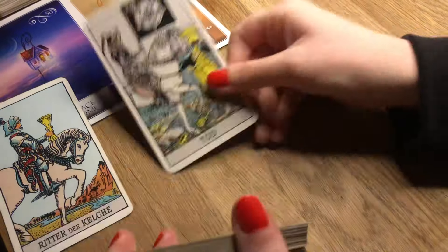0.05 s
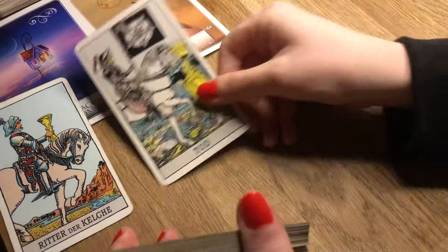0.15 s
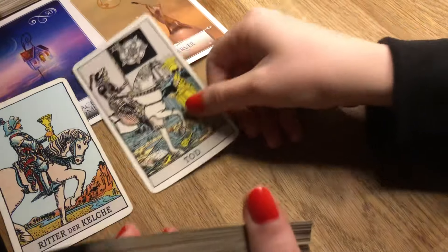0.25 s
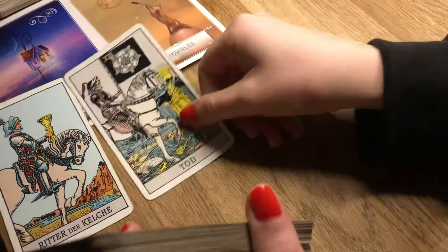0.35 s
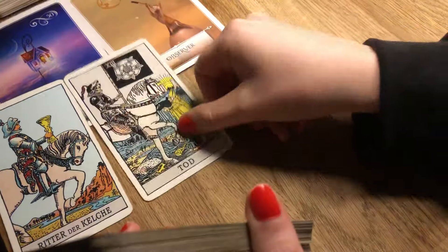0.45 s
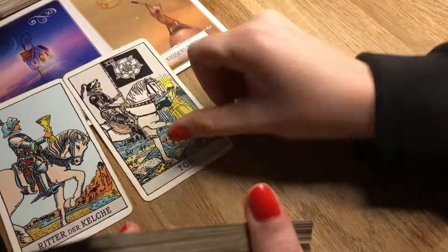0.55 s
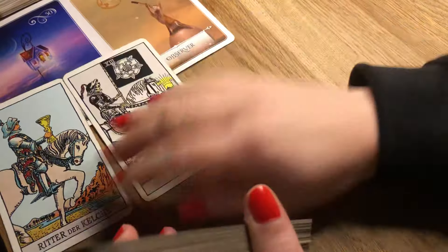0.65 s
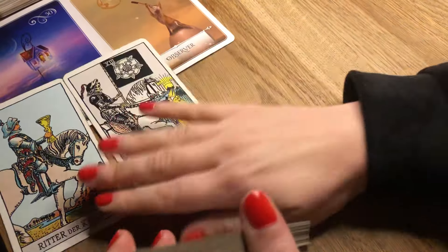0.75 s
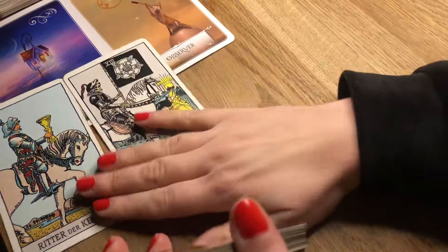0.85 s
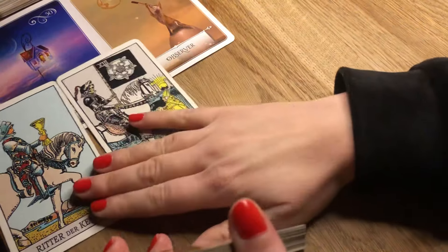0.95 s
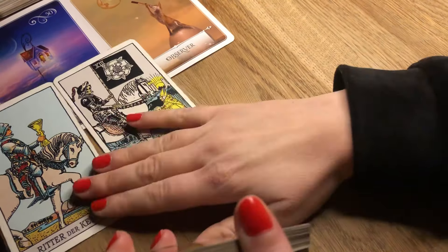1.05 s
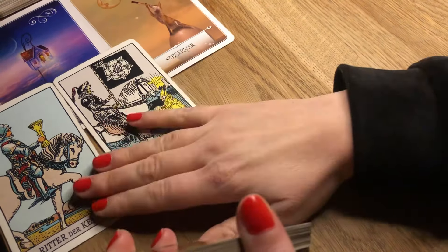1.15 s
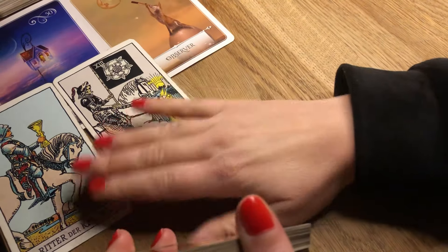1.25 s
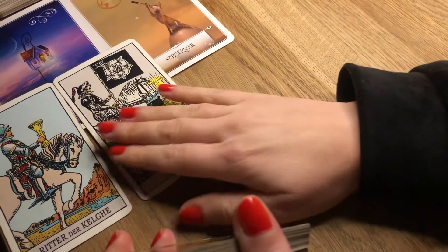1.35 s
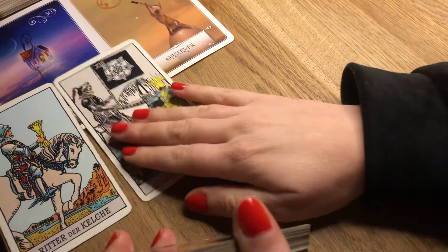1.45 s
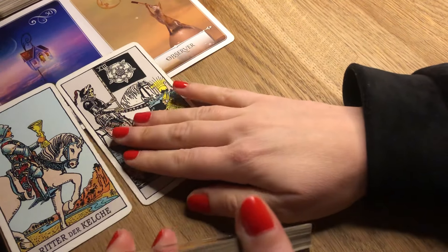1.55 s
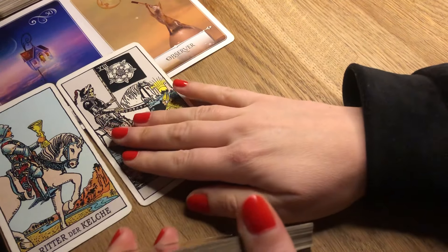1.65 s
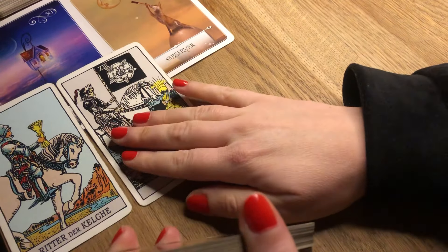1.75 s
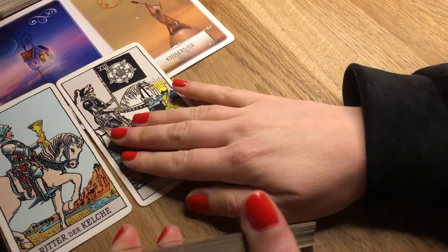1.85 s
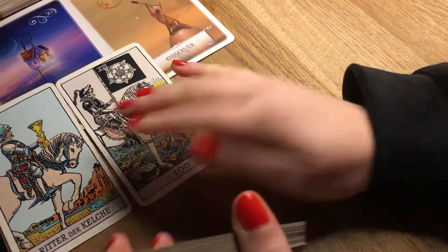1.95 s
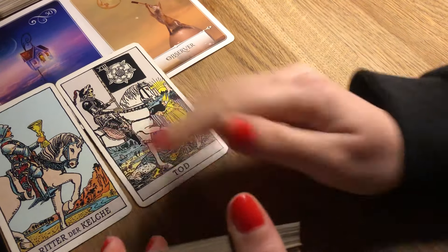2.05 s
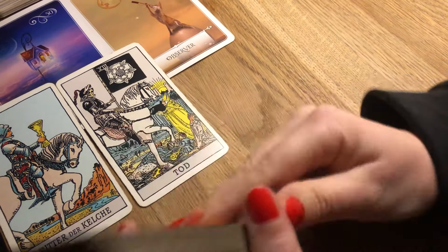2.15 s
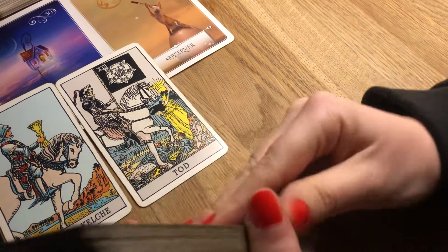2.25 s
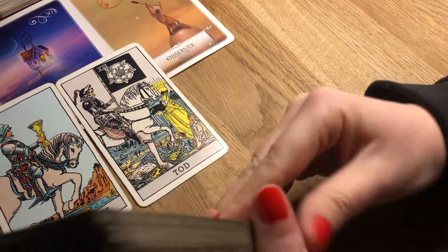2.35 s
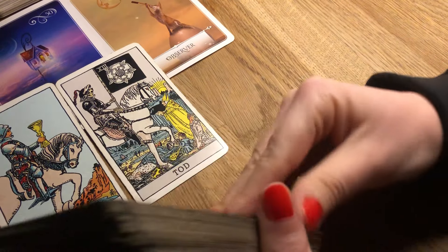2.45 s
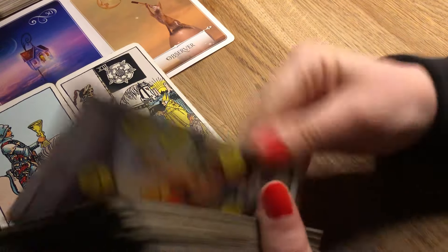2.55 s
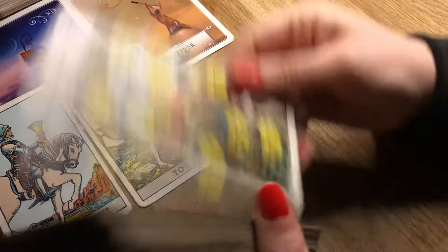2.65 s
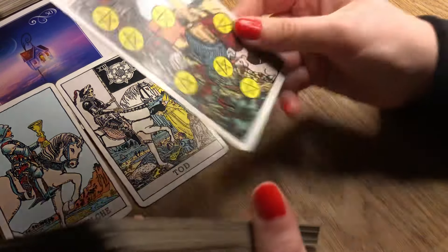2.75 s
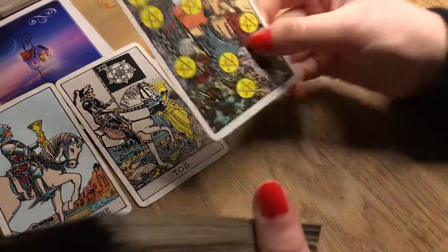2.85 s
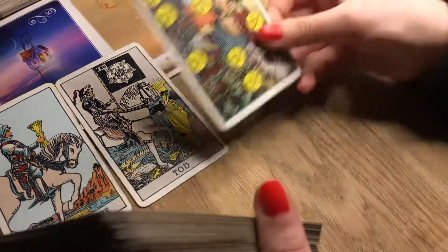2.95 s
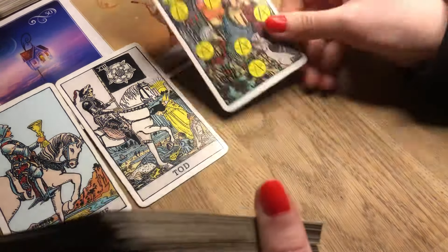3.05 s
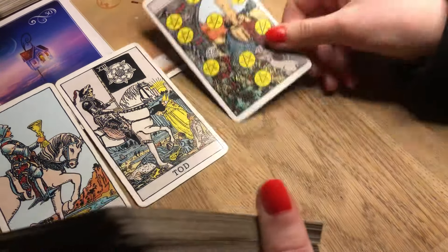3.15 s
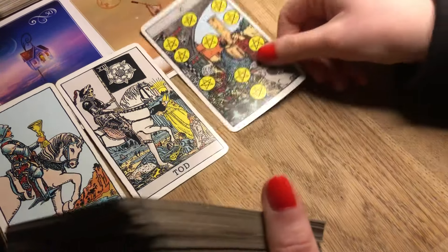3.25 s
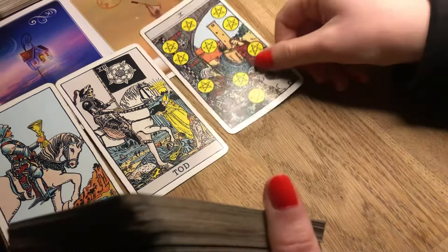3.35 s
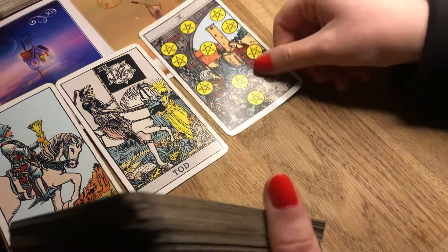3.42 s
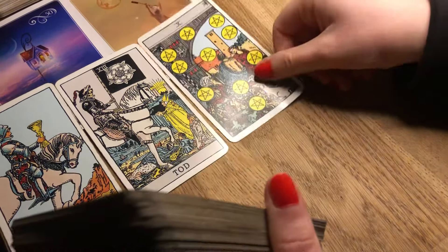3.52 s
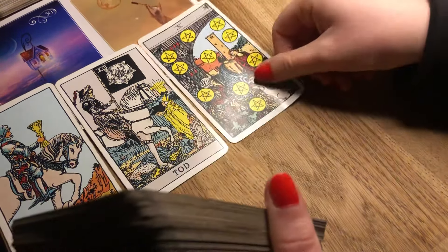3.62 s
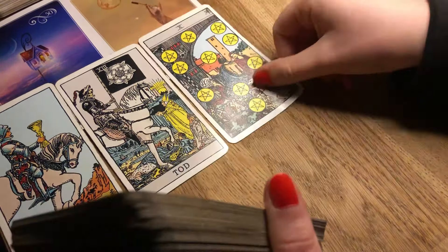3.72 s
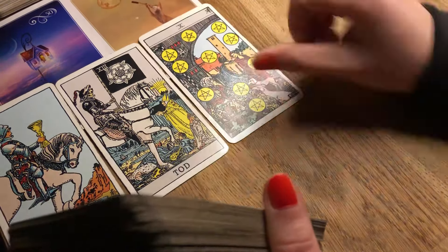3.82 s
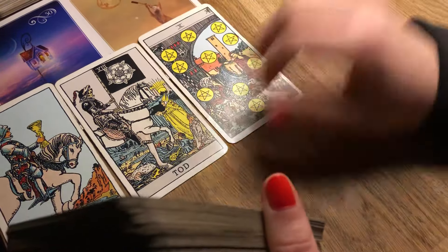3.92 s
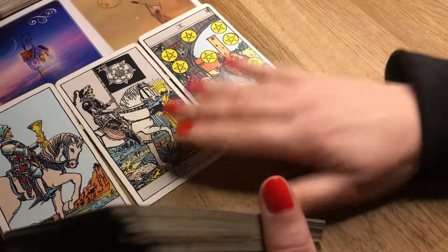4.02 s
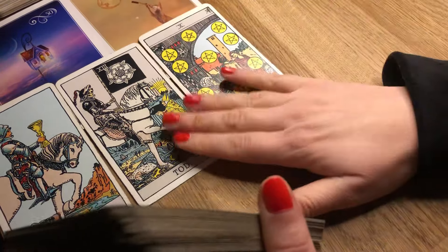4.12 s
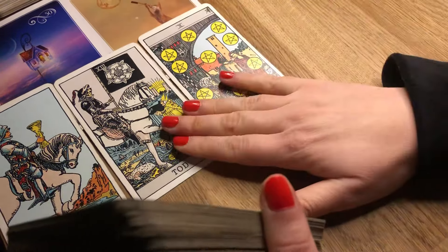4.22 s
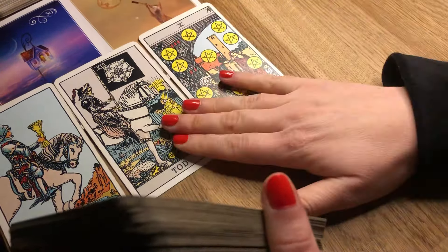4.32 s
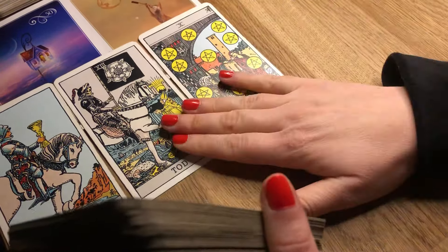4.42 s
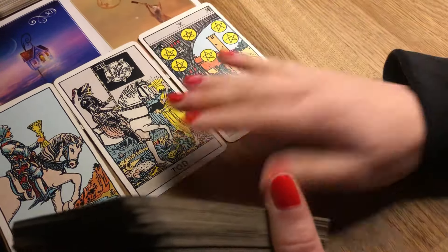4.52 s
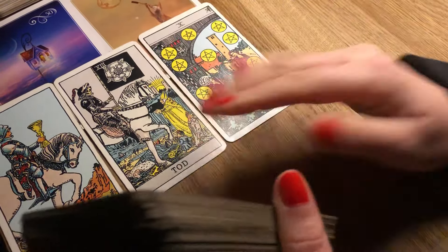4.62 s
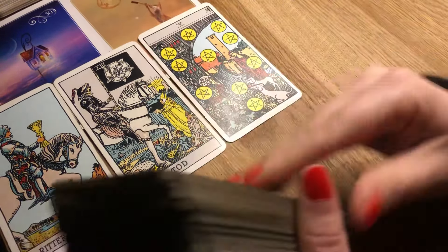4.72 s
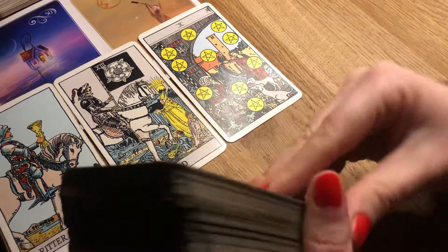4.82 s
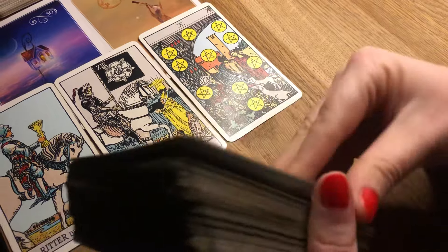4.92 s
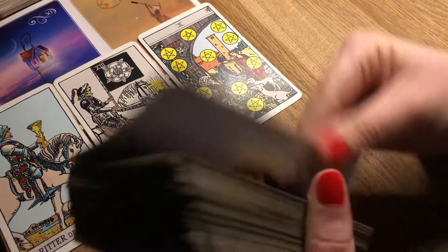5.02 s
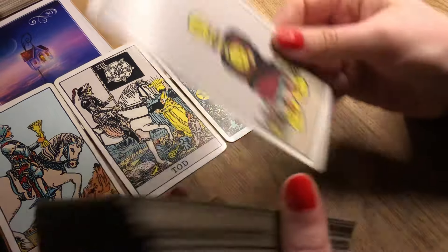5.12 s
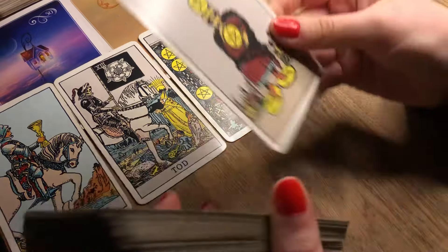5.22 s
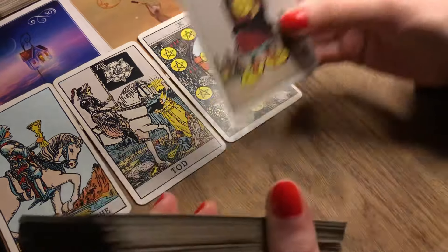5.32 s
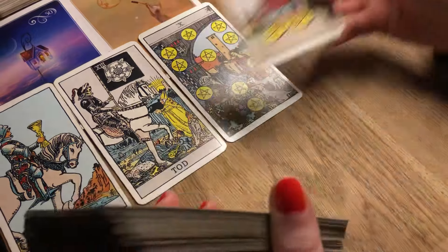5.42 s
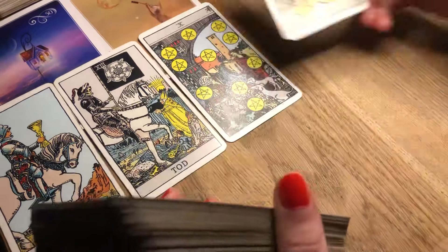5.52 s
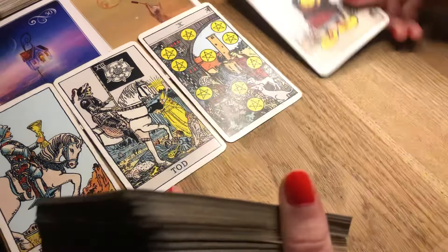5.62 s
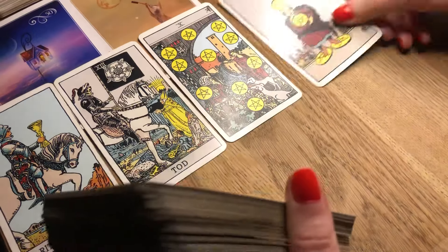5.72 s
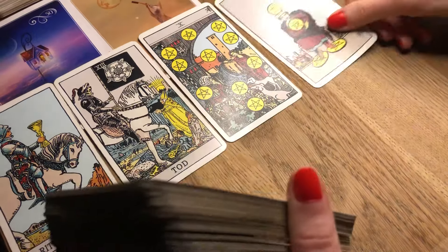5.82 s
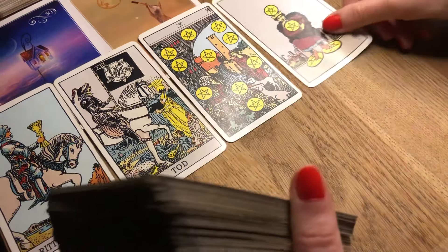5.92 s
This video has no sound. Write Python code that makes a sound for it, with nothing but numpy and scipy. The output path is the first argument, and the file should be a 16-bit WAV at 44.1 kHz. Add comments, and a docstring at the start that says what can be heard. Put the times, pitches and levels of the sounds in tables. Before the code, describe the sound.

Cards being dealt one by one onto wood, with sharp corner snaps, springy pops off the deck and soft hand pats.

```python
"""Dealing cards onto a wooden table

In a small quiet room, a stiff card hisses off the deck and flops as it springs straight.
Cards click down on their edges, slide into place and snap from under the thumb as a bent
corner slaps the wood. The hand pats and smooths them, and the table knocks and rings in
answer. Low rumble, hiss and a thin electric whine hang in the air."""
import sys
import numpy as np
from scipy import signal
from scipy.fft import rfft, irfft
from scipy.io import wavfile
from scipy.ndimage import uniform_filter1d

SR = 44100
rng = np.random.default_rng(int(sys.argv[2]) if len(sys.argv) > 2 else 0)


def store_pcm(level_fs):
    """Save levels as 16-bit WAV."""
    pcm = np.round(np.clip(level_fs, -1, 1) * 32767).astype(np.int16)
    wavfile.write(sys.argv[1], SR, np.atleast_2d(pcm).T)


N = 263277
TIME = np.arange(N) / SR
TAPS = 4096  # samples in one short sound
HZ = np.fft.rfftfreq(TAPS, 1 / SR)

# A bent corner snaps down. Each row: time in seconds, level in dB, brightest pitch in Hz and level in
# dB sent round the room, seconds since it left the finger, slip against slap in dB, knock level in dB,
# knock hardness in Hz, creep level in dB, creep rise in seconds.
SNAPS = [(0.4591, 7.8, 5820, 8.2, .0011, -2, -0.5, 521, -46, 0.017),
         (3.7354, 6.6, 8260, 5.5, 0.0013, -0.5, 2, 1060, -34, .003)]
# A card flexes with a pop, faintly as the hand grips the deck, loudly as it springs free.
# Each row: time in seconds, level in dB, pitch in Hz, air puff in dB,
# rattle against pop in dB, how narrow the pop's band is, papery crackle in dB.
FLOPS = [(2.314, -22, 1026, -21, -13, 21, -52), (2.6685, 10, 904, 7.5, 0, 3.86, -30.5),
         (5.1227, 11, 1010, 8.5, -1, 3.2, -10.5)]
# A card is pulled off the deck. Each row: start, firmest grip and release in seconds, level in dB,
# treble lift of the last edge in dB, swell in dB per second, last flick in dB.
DRAWS = [(2.478, 2.618, 2.657, -44.5, 11.5, 266.5, -26), (4.966, 5.053, 5.112, -45.5, 5.5, 199, -13.5)]
# A card is set on its edge. Each row: time in seconds, relative level in dB, fade in seconds.
SET_DOWNS = [(0.0921, -14.5, 0.014), (3.1188, -23.5, 0.0093), (5.6377, -16.5, 0.015)]
# Nearby surfaces throw a flop back. Each row: delay in seconds, gain.
BOUNCES = [(.00295, 0.66), (.0052, 0.77), (.0083, .3), (0.0173, 0.026)]


def amp(db):
    """Turns decibels into a gain."""
    return 10 ** (np.asarray(db) / 20)


def evened(x):
    """Scales a sound to an average (rms) level of 1."""
    return x / np.sqrt(np.mean(x ** 2) + 1e-20)


def read(points, hz):
    """Reads between the rows of a table, along a scale of octaves."""
    row_hz, value = np.transpose(points)
    return np.interp(np.log(hz + 1), np.log(row_hz + 1), value)


def add(mix, s, sound):
    """Mixes a sound in at s seconds."""
    part = mix[max(round(s * SR), 0):][:len(sound)]
    part += sound[:len(part)]


def tinted(x, colour):
    """Shapes a long sound by rows of Hz and dB, then evens it to level 1."""
    gain = amp(read(colour, np.fft.rfftfreq(N, 1 / SR)))
    return evened(irfft(rfft(x) * gain, N))


def click(gain):
    """The sharpest click that has the given gain at each frequency."""
    log_gain = np.log(np.maximum(gain, 1e-5))
    mirrored = np.concatenate([log_gain, log_gain[-2:0:-1]])
    return np.fft.ifft(np.exp(np.conj(signal.hilbert(mirrored)))).real


def hump(centre_hz, rise, fall):
    """A broad hill of gain over frequency, about 1 high."""
    ratio = HZ / centre_hz
    return 2 * ratio ** rise / (1 + ratio ** (rise + fall))


def peak(hz):
    """A rounded peak of gain, 1 high at the given pitch."""
    return HZ / hz * np.exp(1 - HZ / hz)


def chatter(fade_s):
    """A cluster of tiny contacts that dies by 60 dB in fade_s."""
    burst = rng.standard_normal(TAPS) * amp(-60 * TIME[:TAPS] / fade_s)
    return burst / np.linalg.norm(burst)


def friction(grains_per_s, grain_share, depth_db, patch_s=0.03, patch_hz=600):
    """Fibres catch and let go; brief resonances come and go as the contact point moves."""
    slips = rng.standard_normal(N) * (rng.random(N) < grains_per_s / SR)
    hiss = np.sqrt(1 - grain_share) * rng.standard_normal(N) + np.sqrt(grain_share) * evened(slips)
    hz, t, bands = signal.stft(hiss, SR, nperseg=256)
    patches = rng.standard_normal(bands.shape[::-1]).T
    patches = uniform_filter1d(patches, size=round(patch_s / t[1]), axis=1)
    patches = uniform_filter1d(patches, size=round(patch_hz / hz[1]), axis=0)
    bands = bands * amp(depth_db * evened(patches))
    return evened(signal.istft(bands, SR, nperseg=256)[1][:N])


def background(air_db=-70.13):
    """Low room rumble, hiss and a steady electric whine."""
    # The air's tone and the whine's two notes. Each row: frequency in Hz, level in dB.
    air_colour = [(15, -50), (25, -28), (40, -11.5), (62, -4), (130, -4), (300, -5.5), (500, -10),
                  (1000, -16.5), (2000, -22), (4000, -23), (8000, -27), (15500, -31), (16200, -49)]
    whine_notes = [(7654, -79.5), (15308, -92.5)]
    whine = sum(amp(db) * np.sqrt(2) * np.sin(2 * np.pi * hz * TIME) for hz, db in whine_notes)
    return amp(air_db) * tinted(rng.standard_normal(N), air_colour) + whine


def room(x, gap_s=0.0046, build_s=0.0072, echoes_per_s=5000):
    """Dense echoes begin after a short gap; each band dies at its own speed."""
    # How long the room rings. Each row: frequency in Hz, seconds to fade by 60 dB.
    fades = [(100, 0.53), (300, 0.32), (1000, 0.4), (2500, 0.35), (5500, 0.41), (9000, .28), (15000, 0.25)]
    # The tone of the echoes. Each row: frequency in Hz, gain in dB.
    colour = [(100, 2), (1000, 2), (2200, -1), (5000, -7.5), (9000, -6.5), (15000, -7)]
    t = TIME[:SR * 3 // 4]
    echoes = rng.choice([-1., 1.], len(t)) * (rng.random(len(t)) < echoes_per_s / SR)
    hz, frame_s, bands = signal.stft(echoes, SR, nperseg=256)
    bands *= amp(-60 * frame_s / read(fades, hz)[:, None])
    tail = signal.istft(bands, SR, nperseg=256)[1][:len(t)]
    tail *= np.clip((t - gap_s) / build_s, 0, 1)
    tail = signal.fftconvolve(tail / np.linalg.norm(tail), click(amp(read(colour, HZ))))
    return signal.fftconvolve(x, tail)[:N]


def rubs(uneven_db=1.5, catches_per_s=25, catch_db=-13):
    """Cards and skin rub under uneven pressure: strokes, shifting fingers, the creep before a snap."""
    # The hand slides, turns, smooths or feels for a card.
    # Each row: start in seconds, length in seconds, level in dB, fizz against body in dB.
    strokes = [(0, 0.35, -65.5, -11.5), (0.818, 0.15, -72.5, -9.5), (1.296, 0.2, -70, -8.5),
               (1.945, 0.21, -69.5, -5), (2.915, 0.025, -66, -5), (2.897, 0.14, -69, -1),
               (3.233, 0.062, -67, -17), (3.44, 0.077, -69, -11), (3.659, 0.068, -69.5, -6),
               (3.906, .14, -71, -8), (4.557, .15, -72, -5), (4.839, 0.067, -66, -1.5),
               (5.362, 0.2, -68, -1), (5.687, 0.11, -66.5, -12)]
    # The tones of a rub's body, its high fizz and the creep. Each row: frequency in Hz, level in dB.
    body_colour = [(60, -30.5), (250, -3), (600, -0.5), (1500, -0.5), (3800, 1), (6500, -7), (9000, -19.5),
                   (16000, -40)]
    fizz_colour = [(3000, -25), (6500, -1), (9000, 1.5), (12000, 0), (16000, -5.5)]
    creep_colour = [(200, -12), (1200, -5.5), (2400, -7), (4000, -1), (6000, -5.5), (9000, -10),
                    (16000, -24)]
    catches = evened(rng.choice([-1., 1.], N) * (rng.random(N) < catches_per_s / SR))
    grain = friction(grains_per_s=2100, grain_share=0.083, depth_db=2.24) + amp(catch_db) * catches
    body, fizz = tinted(grain, body_colour), tinted(grain, fizz_colour)
    pressure = amp(uneven_db * tinted(rng.standard_normal(N), [(10, 0), (50, -4), (200, -60)]))
    # one more stroke after each draw, as the fingers shift on the card
    shifts = [(free + 0.085, 0.11, -67, -1.5) for _, _, free, *_ in DRAWS]
    out = np.zeros(N)
    for start, length, db, fizz_db in strokes + shifts:
        speed = np.exp(-((TIME - start - length / 2) / (0.44 * length)) ** 2 / 2)
        out += amp(db) * speed * (body + amp(fizz_db) * fizz)
    # the bent corner creeps ever faster over the fingertip until it lets go
    creep = sum(amp(db) * np.exp(-abs(s - TIME) / rise) * (TIME < s) for s, *_, db, rise in SNAPS)
    return pressure * (out + creep * tinted(grain, creep_colour))


def knocks(spread=0.085, ring_db=-53, edge_db=-6.5, edge_hz=1300, jolt_db=-11, jolt_hz=192):
    """Each blow sends bending waves across the table, the bass arriving last, and the wood rings on."""
    # The table's own notes. Each row: pitch in Hz, relative level in dB, seconds to fade by 60 dB.
    notes = [(65, -5, 0.67), (121, -2.5, 0.2), (222, 1.5, 0.61), (322.5, 1, 0.15), (394, -8.5, 0.41),
             (728, -14, .3), (883, -12.5, .28), (1020, -8.5, .25)]
    # The first push through the wood. Each row: frequency in Hz, level in dB.
    push_colour = [(20, -35), (60, -11), (150, -1), (310, 7.5), (470, -1), (750, 4), (1050, 3.5),
                   (1400, -5.5), (2500, -17.5), (16000, -47)]
    # Finger pads land. Each row: time in seconds, level in dB, hardness in Hz (higher is brighter).
    pats = [(.876, -12, 100), (1.322, -9.5, 100), (2.464, -22, 676), (4.229, -15.5, 380),
            (5.64, -12.5, 150.6), (5.855, -14, 182)]
    t = TIME[:SR // 2]
    wood = sum(amp(ring_db + db - 60 * t / fade) * np.sin(2 * np.pi * hz * t) for hz, db, fade in notes)
    bass_lag = np.exp(-4j * np.pi * spread * np.sqrt(HZ))
    add(wood, 0, irfft(amp(read(push_colour, HZ)) * bass_lag))
    corners = [(s - lead, db, hz) for s, _, _, _, lead, _, db, hz, _, _ in SNAPS]
    edges = [(s, db + edge_db, edge_hz) for s, db, _ in SET_DOWNS]
    jolts = [(s, jolt_db, jolt_hz) for s, *_ in FLOPS]  # passed on by the hand that holds the deck
    out = np.zeros(N)
    for s, db, hz in pats + corners + edges + jolts:
        blow = click(1 / np.sqrt(1 + (HZ / hz) ** 4))
        add(out, s, amp(db) * signal.fftconvolve(wood, blow))
    return out


def ticks(trim_db=-2, edge_hz=3200, flick_lead_s=0.0066, flick_hz=7000, flick_fade_s=0.008):
    """Nails and card edges touch with a short dry chatter."""
    # Nails catch on a card.
    # Each row: time in seconds, relative level in dB, brightness in Hz, fade in seconds.
    nails = [(0.027, -27.5, 9500, .09), (.22, -23.5, 2396, 0.068), (.861, -32, 4500, 0.056),
             (2.147, -30.5, 7940, 0.0098), (2.2803, -29, 6160, .08), (2.4631, -22, 4210, 0.12),
             (3.6513, -31.5, 3460, .02), (3.6834, -30, 6140, .018), (4.478, -36.5, 6370, .03),
             (4.742, -29, 6000, 0.14), (4.956, -29, 3500, .02), (4.9719, -23, 4500, 0.0053),
             (5.4484, -26.5, 3460, 0.022), (5.858, -33, 4500, 0.076)]
    edges = [(s, db, edge_hz, fade_s) for s, db, fade_s in SET_DOWNS]
    flicks = [(free - flick_lead_s, db, flick_hz, flick_fade_s) for _, _, free, *_, db in DRAWS]
    out = np.zeros(N)
    for s, db, hz, fade_s in nails + edges + flicks:
        touch = click(hump(hz, rise=0.49, fall=1.82))
        add(out, s, amp(db + trim_db) * signal.fftconvolve(touch, chatter(fade_s)))
    return out


def draws(treble_hz=7000, treble_db=1, full_speed_s=0.065, grip_db=-11, grip_s=0.014,
          edge_s=0.016, runout_db=-3):
    """Card slides on card: louder as it speeds up, dull under the grip, bright at the last edge."""
    # The tone of the slide. Each row: frequency in Hz, level in dB.
    colour = [(100, -21), (500, -13.5), (900, -13.5), (1400, -8), (2000, -11), (2900, -3.5), (4400, -6.5),
              (7000, -10.5), (10000, -13.5), (14500, -20.5), (16000, -26.5)]
    hiss = tinted(friction(grains_per_s=3500, grain_share=0.29, depth_db=3.55), colour)
    treble = signal.sosfiltfilt(signal.butter(2, treble_hz, "high", fs=SR, output="sos"), hiss)
    out = np.zeros(N)
    for start, firmest, free, db, edge_db, db_per_s, _ in DRAWS:
        left_s = np.maximum(free - TIME, 0)
        touching = uniform_filter1d(((TIME >= start) & (TIME <= free)) * 1., size=128)
        grip = np.exp(-((TIME - firmest) / grip_s) ** 2 / 2)
        edge = np.exp(-(left_s / edge_s) ** 2 / 2)
        gain = amp(db - db_per_s * np.maximum(left_s - full_speed_s, 0) + runout_db * edge)
        lift = amp(treble_db + grip_db * grip + edge_db * edge)
        out += touching * gain * (hiss + (lift - 1) * treble)
    return out


def sideways_pops(db=-12, hz=1750, sharpness=12):
    """Each drawn card throws a higher pop sideways, heard only by way of the room."""
    out = np.zeros(N)
    for _, _, free, *_ in DRAWS:
        add(out, free + BOUNCES[2][0], amp(db) * click(peak(hz) ** sharpness))
    return out


def flops(puff_hz=225, puff_delay_s=0.00531, pull_gap_s=0.00837, broad_db=-29, rattle_s=0.0042,
          ring_hz=965, ring_db=-61, ring_fade_s=0.238, crackle_hz=3000, crackle_width_hz=900):
    """A card flexes: a pop with close echoes, a rattle, a puff of air and a brief ring."""
    out, middle_s = np.zeros(N), TAPS / 2 / SR
    echoes = 1 + sum(gain * np.exp(-2j * np.pi * HZ * delay) for delay, gain in BOUNCES)
    ring = amp(ring_db - 60 * TIME[:SR] / ring_fade_s) * np.cos(2 * np.pi * ring_hz * TIME[:SR])
    # the flexing card pulls in air twice
    pulls = 1 + 0.37 * np.exp(2j * np.pi * HZ * pull_gap_s)
    puff = peak(puff_hz) * pulls * np.exp(-2j * np.pi * HZ * puff_delay_s)
    # the rattle swells and dies around the first echo
    swell = np.exp(-abs(TIME[:TAPS] - middle_s - BOUNCES[0][0]) / rattle_s)
    for s, db, hz, puff_db, rattle_db, sharpness, crackle_db in FLOPS:
        pop = peak(hz) ** (2 * sharpness) + amp(broad_db) * np.e * peak(hz)
        shake = rng.standard_normal(TAPS) * swell
        rattle = rfft(np.fft.fftshift(shake / np.linalg.norm(shake)))
        crackle = amp(crackle_db) * rattle * np.exp(-((HZ - crackle_hz) / crackle_width_hz) ** 2)
        spectrum = amp(db) * pop * (echoes + amp(rattle_db) * rattle) + crackle - amp(puff_db) * puff
        add(out, s - middle_s, np.fft.fftshift(irfft(spectrum)))
        add(out, s, amp(db) * ring)
    return out


def snaps(slip_fade_s=0.0033, flutter_fade_s=0.018, flutter_db=-8, lowest_hz=1300,
          slip_around_db=-7, slip_hz=5300, slip_width_hz=2800):
    """A corner scrapes off the finger, slaps the wood and flutters; gives direct and all-round sound."""
    # The card's resonances, one list a snap. Each row: pitch in Hz, width in Hz, level in dB.
    cards = [
        [(1877, 900, -14.5), (3907, 710, -1), (4700, 520, -0.5), (5750, 400, 1), (7120, 190, -6.5),
         (8523, 1200, 1.5), (14150, 1900, -6.5)],
        [(1730, 220, -5), (2850, 350, -4.5), (3480, 280, -3.5), (5100, 500, -11), (6000, 490, -5.5),
         (8600, 710, 3.5), (11500, 1900, -2.5)],
    ]
    direct, around = np.zeros(N), np.zeros(N)
    # the slip's echo is a softer click, in a band around 5 kHz
    slip_band = np.fft.fftshift(irfft(np.exp(-((HZ - slip_hz) / slip_width_hz) ** 2)))
    bass_loss = HZ ** 2 / (HZ ** 2 + lowest_hz ** 2)  # a small card gives off little bass
    for (s, db, bright_hz, around_db, lead, slip_db, *_), card in zip(SNAPS, cards):
        power = sum(amp(level) ** 2 / (1 + (2 * (HZ - hz) / width) ** 2) for hz, width, level in card)
        slap = amp(db) * click(np.sqrt(power) * bass_loss)
        add(direct, s - lead, amp(slip_db) * signal.fftconvolve(slap, chatter(slip_fade_s)))
        add(direct, s, slap)
        add(direct, s, amp(flutter_db) * signal.fftconvolve(slap, chatter(flutter_fade_s)))
        # summed over all directions, the resonances partly even out
        spread = amp(around_db) * click(np.sqrt(0.29 + power) * hump(bright_hz, rise=0.53, fall=0.96))
        add(around, s - lead, amp(slip_around_db) * signal.fftconvolve(spread, slip_band)[TAPS // 2:])
        add(around, s, spread)
    return direct, around


def scene():
    """Cards, hand and table are heard directly and through the room, over the background."""
    snap, snap_around = snaps()
    flop, tick, knock, slide = flops(), ticks(), knocks(), draws() + rubs()
    into_room = (amp(-8.5) * snap_around + amp(-15.5) * flop + amp(-6) * tick
                 + amp(-7.5) * knock + amp(-12) * slide + sideways_pops())
    return (snap + flop + tick + knock + slide + room(into_room) + background())[None]


def record(dry, low_hz=50, high_hz=16100):
    """The microphone sheds deep bass; the very highest treble is cut too."""
    thinned = signal.sosfilt(signal.butter(2, low_hz, "high", fs=SR, output="sos"), dry)
    treble_cut = signal.firwin(255, high_hz, window=("kaiser", 9), fs=SR)
    return signal.oaconvolve(thinned, treble_cut[None], "same")


dry = scene()
out = record(dry)
store_pcm(out)
```